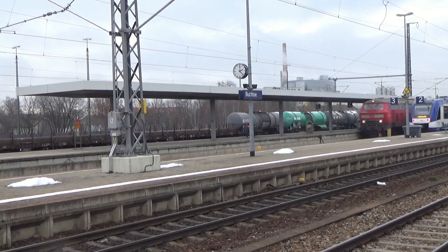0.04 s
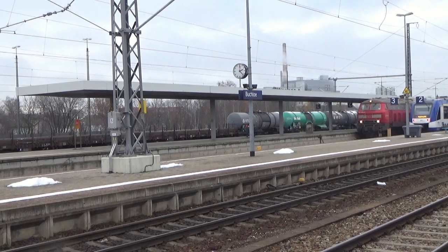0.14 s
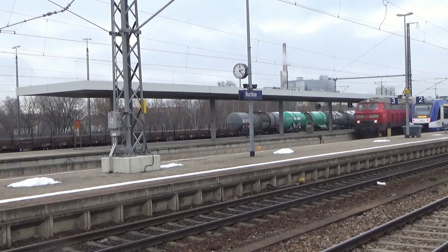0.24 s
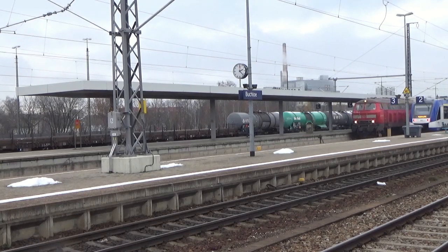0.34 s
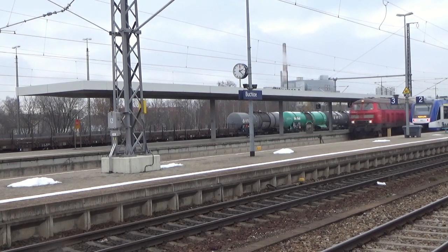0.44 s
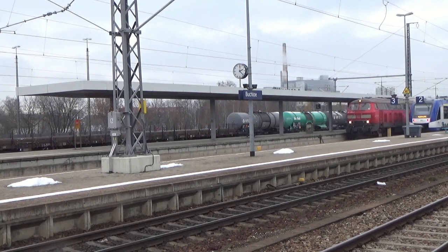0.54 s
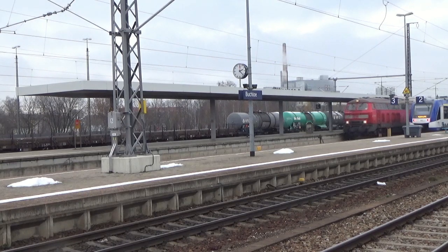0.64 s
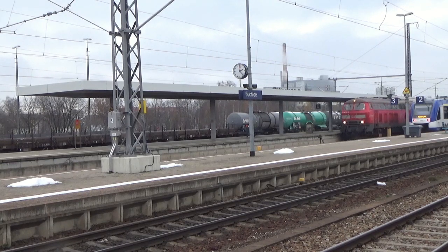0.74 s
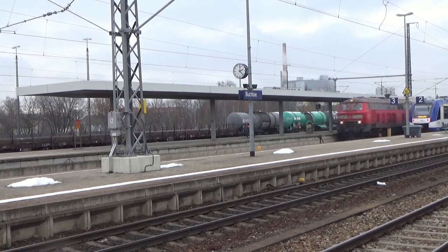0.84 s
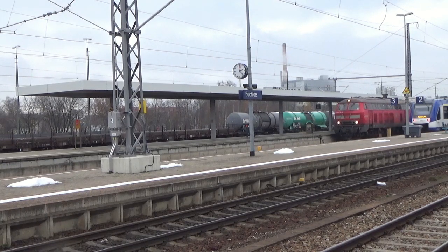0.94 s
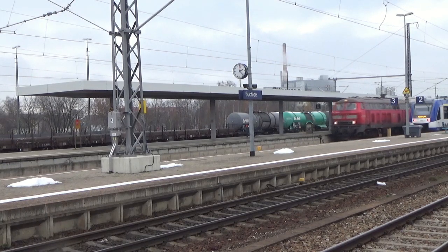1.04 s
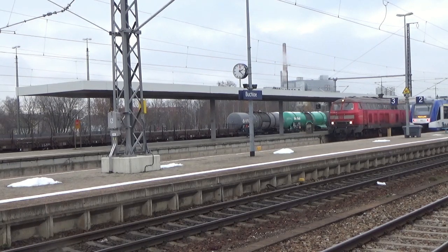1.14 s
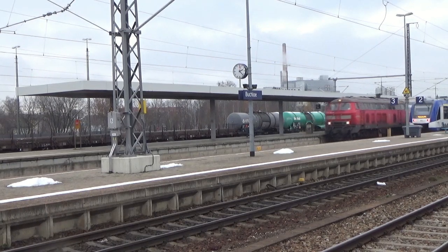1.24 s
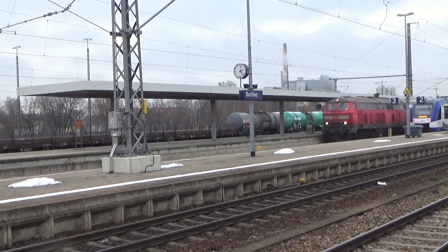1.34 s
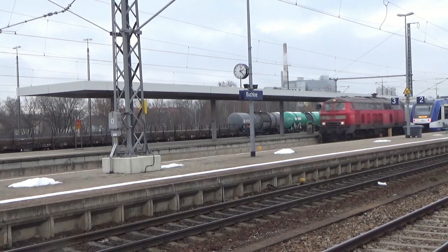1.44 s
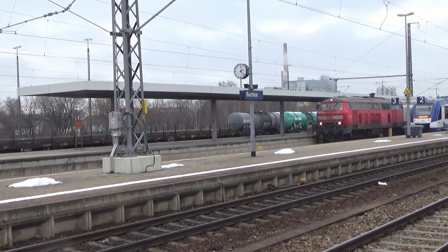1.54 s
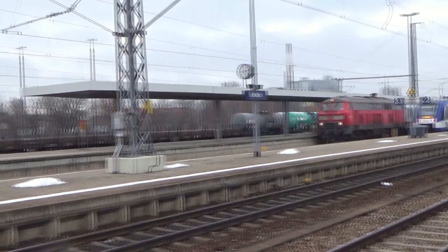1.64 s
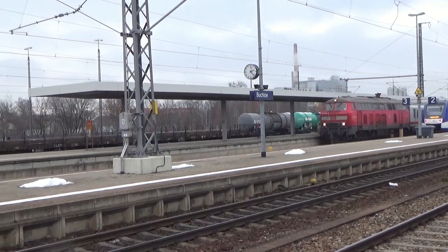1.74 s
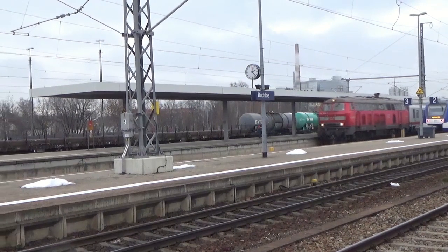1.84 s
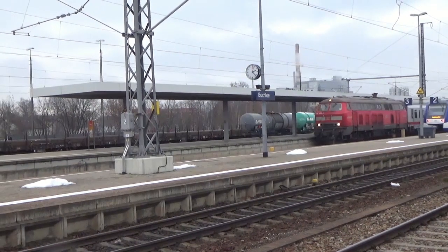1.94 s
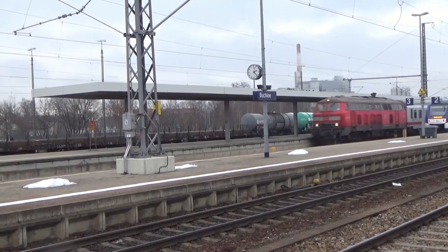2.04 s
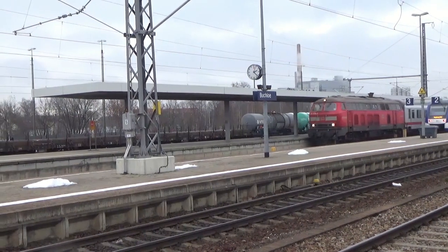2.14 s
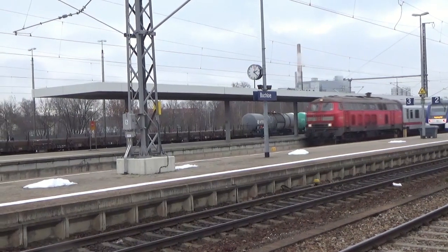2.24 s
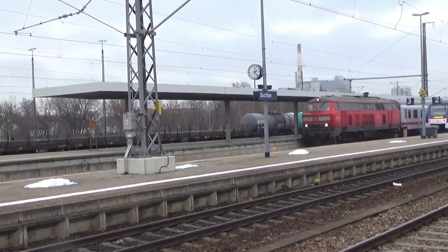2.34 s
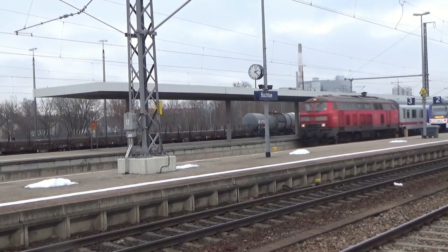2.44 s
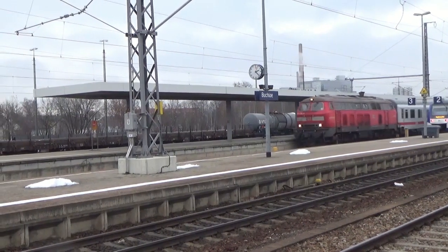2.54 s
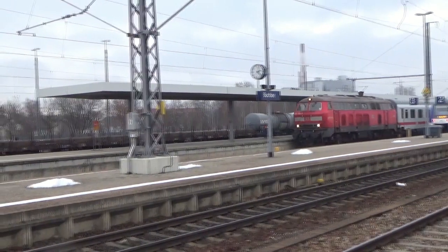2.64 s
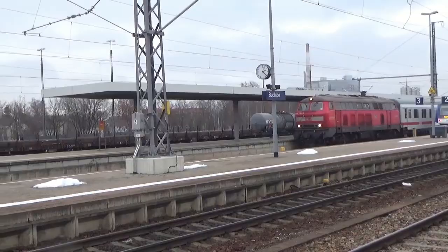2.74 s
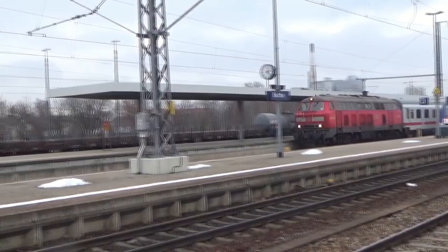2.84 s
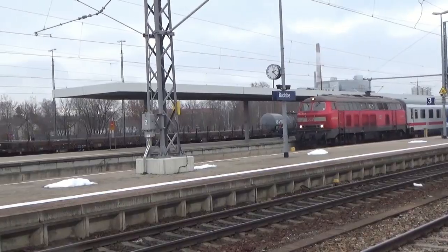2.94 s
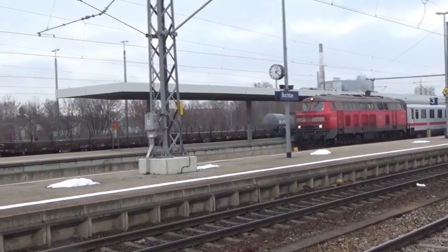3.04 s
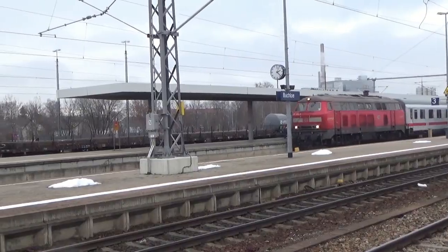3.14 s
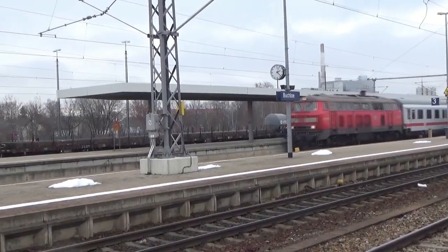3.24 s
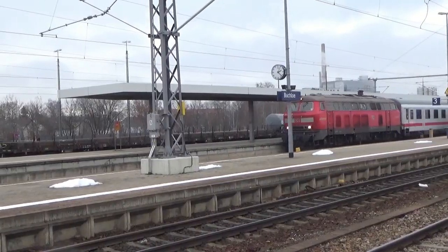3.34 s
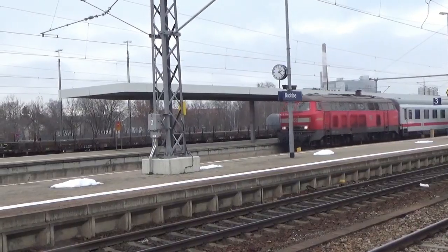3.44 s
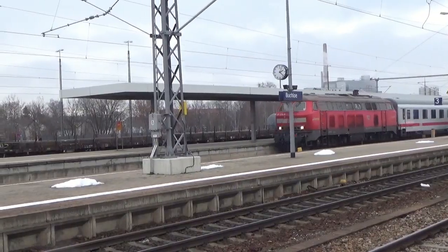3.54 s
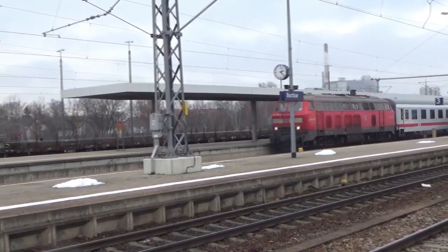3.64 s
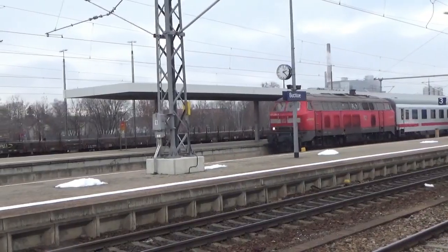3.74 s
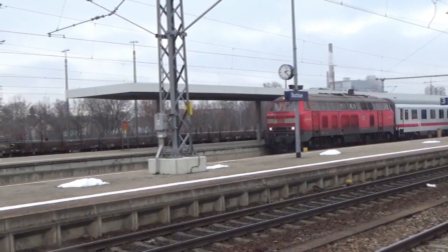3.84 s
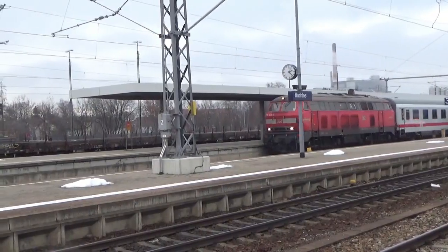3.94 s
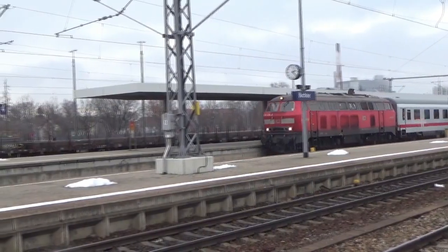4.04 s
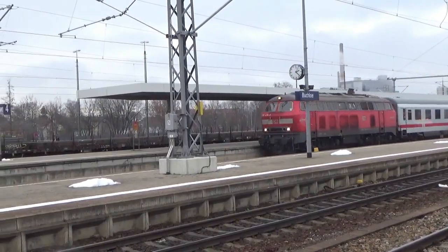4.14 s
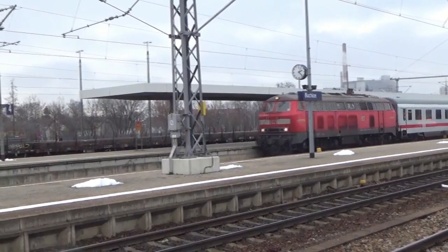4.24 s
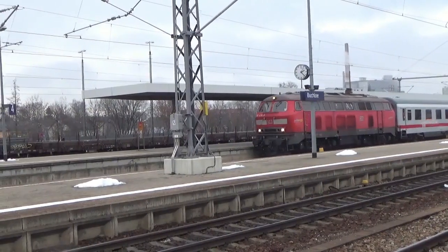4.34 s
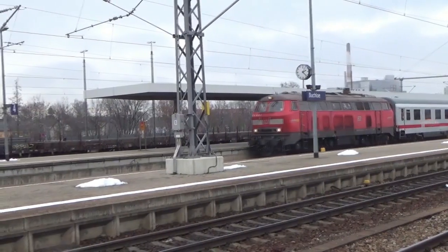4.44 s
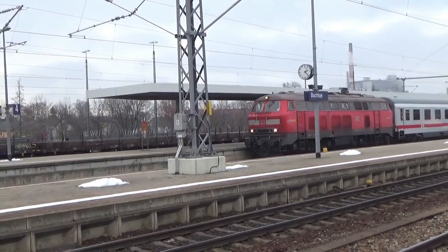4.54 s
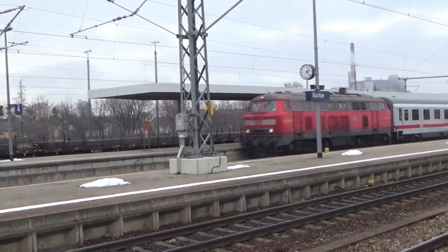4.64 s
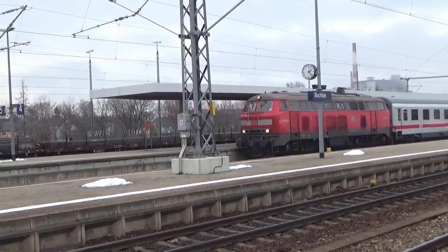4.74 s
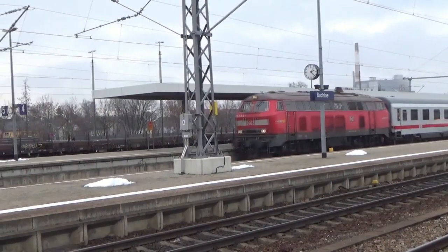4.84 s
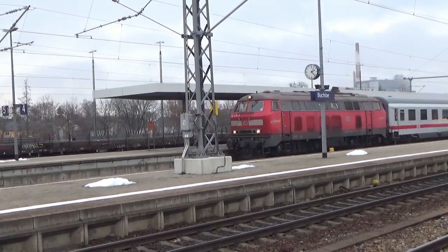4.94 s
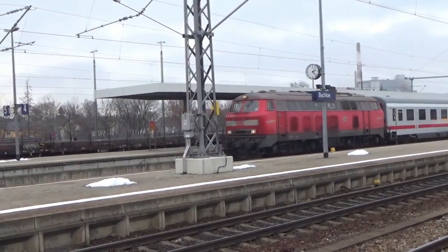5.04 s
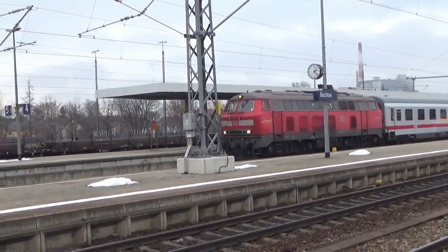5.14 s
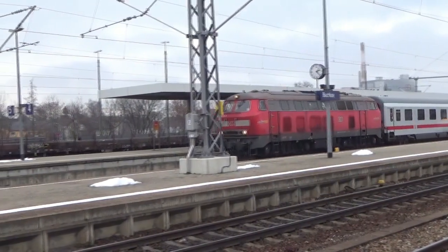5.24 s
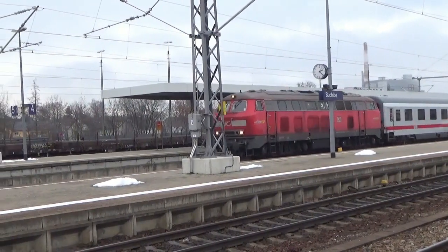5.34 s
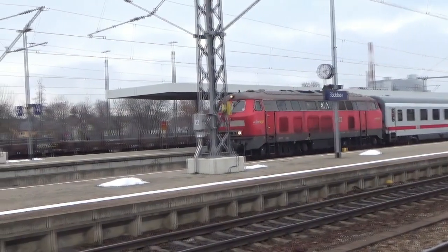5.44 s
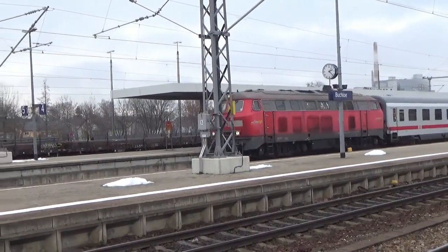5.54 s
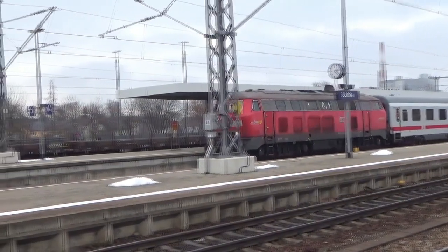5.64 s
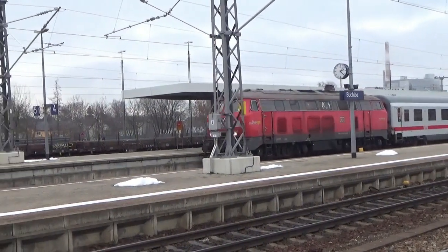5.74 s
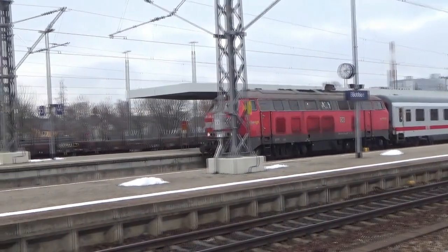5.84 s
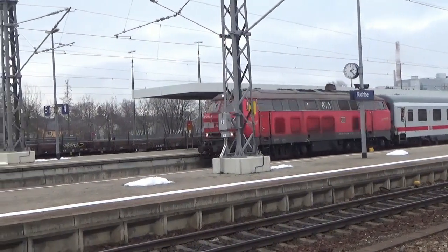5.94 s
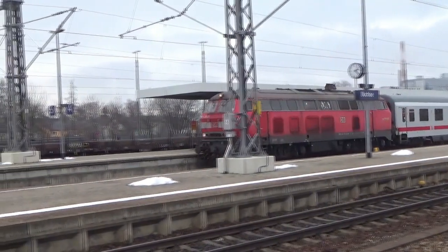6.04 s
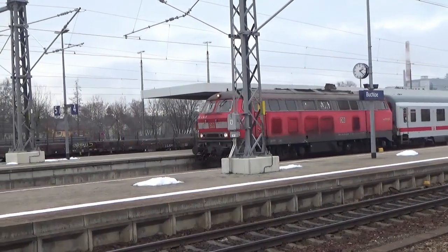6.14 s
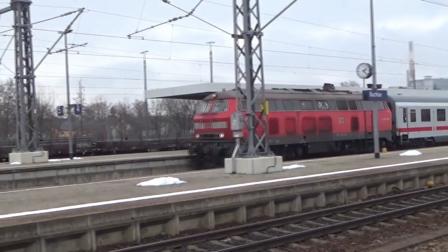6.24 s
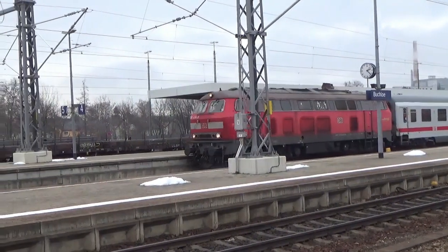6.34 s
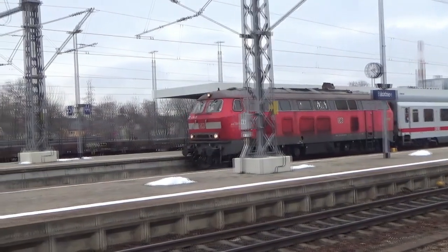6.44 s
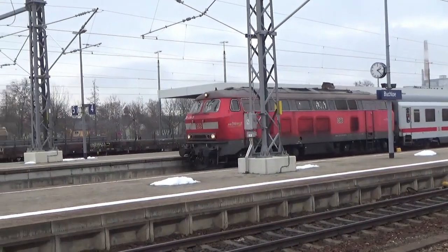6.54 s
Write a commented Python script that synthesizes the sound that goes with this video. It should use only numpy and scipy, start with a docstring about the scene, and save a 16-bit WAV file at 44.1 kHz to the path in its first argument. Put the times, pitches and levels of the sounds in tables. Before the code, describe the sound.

Idling diesel engine approaches with growing clatter and brake hiss; a harsh high squeal lasts about a second, followed by lower wheel moans.

```python
"""A diesel locomotive rolls into an open station, ticking over at about 600 rpm: noise shaped by silencer and
housing, partly recurring with each turn. Nearing, it grows louder, wider and different in colour.
From 2 s the brake blocks' hiss, coloured noise, stands out more. At about 4.3 s two beating rim tones squeal
in a ragged ringing for about a second, with a short chatter of resonances. The engine dips briefly at 4.8 s.
From 4.6 s six lower grinding moans, narrow notes in fuzzy bands, follow one another to the end."""
import sys
import numpy as np
from scipy import signal
from scipy.fft import rfft, irfft
from scipy.io import wavfile
from scipy.ndimage import uniform_filter1d

SR = 44100
rng = np.random.default_rng(int(sys.argv[2]) if len(sys.argv) > 2 else 0)


def log_audio(samples):
    """Write samples as a 16-bit WAV file to the path given in sys.argv[1]."""
    # one column per channel
    frames = np.atleast_2d(samples).T
    # limit to full scale, then quantise
    limited = np.clip(frames, -1, 1)
    pcm = np.round(limited * 32767).astype(np.int16)
    wavfile.write(sys.argv[1], SR, pcm)


N = 290619
TIME_S = np.arange(N) / SR
FRAME, OVERLAP = 2048, 1536  # samples
BIN_HZ = np.fft.rfftfreq(FRAME, 1 / SR)
SOUND_HZ = np.fft.rfftfreq(N, 1 / SR)

# Likeness of the ears with the train close: f/Hz, likeness/1
EAR_LIKENESS = [(40, .88), (150, .96), (500, .93), (900, .8), (2600, .74), (4400, .87), (5400, .74),
                (7400, .6), (9000, .74)]
# Left minus right level: f/Hz, difference/dB
EAR_LEVEL = [(150, 0), (550, -1), (770, -3.8), (1000, -2), (1600, -1.6), (2400, -2.7), (4100, -2.7),
             (4500, -1.8), (7500, -.2), (9000, -1.6)]
# Phase lead of the left ear: f/Hz, lead/rad
EAR_PHASE = [(100, 0), (700, .13), (2000, 0), (4400, -.22), (6300, -.05), (8700, .35), (9500, 0)]
# Approach: t/s, crankshaft rate as heard/(turns/s), nearness/1
APPROACH = [(0, 10.0, 0), (1.8, 10.02, .1), (3.7, 9.965, .6), (5.8, 9.94, 1), (6.6, 9.94, 1)]
# Engine spectrum head-on from afar: f/Hz, relative density/dB
ENGINE_FAR = [(15, -70), (25, -48), (66, -20), (134, -23.5), (177, -11), (211, -10.5), (258, -6.5),
              (360, -10), (540, -4.5), (1220, -1.5), (1450, -6.5), (1780, -3.5), (2350, -9), (3810, -9),
              (10800, -36.5), (14000, -69), (22000, -120)]
# Engine spectrum close from the side: f/Hz, relative density/dB
ENGINE_NEAR = [(15, -66), (25, -38), (130, -23.5), (211, -12), (333, -15), (513, -9.5), (993, -6.5),
               (1220, 0.5), (1530, -9.5), (1780, -8), (3530, -14.5), (4440, -14), (5580, -28.5),
               (9040, -21.5), (10800, -28.5), (14000, -61), (22000, -120)]
# Silencer and housing resonances: f/Hz, width/Hz, gain/dB
HOUSING_MODES = [(190, 30, 4), (265, 40, 3.5), (333, 39, -4), (571, 106, 2), (798, 52, -3.5),
                 (1980, 127, 3.5), (2350, 230, -1.5), (2580, 130, 2.5), (2860, 240, -2), (3210, 110, 1.5),
                 (3350, 140, -2), (3820, 250, 3), (4260, 240, -2), (5400, 170, 3), (6100, 620, 6)]
# Share of engine power that recurs each turn: f/Hz, share/1
RECURRING_SHARE = [(40, .4), (200, .55), (600, .62), (1100, .48), (2000, .2), (4000, .05)]
# Block hiss, 7-10.5 kHz, before trim and flutter: t/s, level/dB
RUB_LEVEL = [(0.0, -68), (1.99, -64), (2.01, -59.5), (4.36, -47), (4.98, -50), (5.84, -49), (6.09, -52.5),
             (6.55, -51)]
# Block hiss spectrum before the bass cut: f/Hz, relative density/dB
RUB_COLOUR = [(1500, -0.5), (3300, 8), (4400, 7), (5000, 2), (6200, 3), (7500, 0), (8800, -0.5),
              (10800, -9.5)]
# Wheel modes stirred by rubbing: f/Hz, width/Hz, gain/dB
WHEEL_MODES = [(4460, 80, 5), (4840, 70, 4), (5260, 170, 4), (5960, 160, 3), (6870, 110, 1),
               (8000, 190, 1.5)]
# Squealing rims, before power levelling: f/Hz, level/dB
RIM_TONES = [(4423.7, -3.6), (4359.2, -8.2)]
# Ragged ringing round the rims, before power levelling: f/Hz, pole width/Hz, level/dB
RIM_RINGING = [(4410, 310, -2.5), (3976, 620, -11), (4660, 1450, -13.5)]
# Squeal flares: middle t/s, length/s, boost/dB
FLARES = [(4.74, 0.054, 2.5), (5.05, 0.017, 7), (5.245, 0.23, 4.5)]
# Rough chatter bands: f/Hz, pole width/Hz, relative level/dB
CHATTER_BANDS = [(2264, 240, -0.1), (6510, 650, 0)]
# Wheel tones set off by chatter: f/Hz, pole width/Hz, relative level/dB
CHATTER_TONES = [(2205, 10, -5.5), (6921, 10, -9), (7480, 120, -18)]
# Grinding moans: middle t/s, length/s, level/dB, f/Hz
MOANS = [(4.633, 0.27, -33.5, 1122), (5.004, 0.3, -31, 1123), (5.42, .52, -30, 1172),
         (5.872, 0.34, -29.5, 1215), (6.156, 0.19, -28.5, 1161), (6.387, 0.2, -25, 1210)]

# Even slowing, from t = 0; sets the engine level
DISTANCE_M, SPEED_M_PER_S, BRAKING_M_PER_S2 = 99, 14.52, 1.88
# Engine band targets at t = 0, before the exhaust crossfade: 450-1000 Hz, 100-400 Hz
CLATTER_DB, RUMBLE_DB = -38, -46.5
LULL_S, LULL_HALF_WIDTH_S, LULL_DB = 4.79, 0.39, -3
BITE_S, EASE_S = 4.27, 4.797  # hardest bite begins, ends
SQUEAL_DB, SQUEAL_RISE_DB_PER_S, SQUEAL_FADE_DB_PER_S = -18.5, 107, 23
CHATTER_DB, CHATTER_RISE_DB_PER_S, CHATTER_FADE_DB_PER_S = -34, 188, 96
EDGE_HZ = 11000


def gain_of(db):
    """Decibels to amplitude."""
    return 10 ** (np.asarray(db) / 20)


def evened(x):
    """Scale to rms 1."""
    return x / np.sqrt(np.mean(x ** 2) + 1e-20)


def read(points, hz):
    """Interpolate a spectrum table on a log-frequency axis."""
    f, value = np.transpose(points)
    return np.interp(np.log(hz + 1), np.log(f + 1), value)


def follow(rows, t=TIME_S):
    """Interpolate the columns of a time table at t."""
    s, *columns = np.transpose(rows)
    return [np.interp(t, s, c) for c in columns]


def bumps(modes, hz):
    """Summed gain in dB of a resonance table."""
    return sum(db * np.exp(-2 * ((hz - centre) / width) ** 2) for centre, width, db in modes)


def swell(middle_s, length_s, t=TIME_S):
    """Gaussian rise and fall of height 1; length between the 1/e points."""
    return np.exp(-(2 * (t - middle_s) / length_s) ** 2)


def wander(rate_hz):
    """Slow random drift of rms 1: noise under a Gaussian low-pass."""
    spectrum = rfft(rng.standard_normal(N))
    return evened(irfft(spectrum * np.exp(-(SOUND_HZ / rate_hz) ** 2), N))


def spectra(x):
    """Short-time spectra, frames by bins."""
    return signal.stft(x, nperseg=FRAME, noverlap=OVERLAP)[2].swapaxes(-1, -2)


def sound(z):
    """Short-time spectra back to samples."""
    return signal.istft(z.swapaxes(-1, -2), nperseg=FRAME, noverlap=OVERLAP)[1][..., :N]


def ring(hz, width_hz):
    """Resonance kept ringing by random friction: double-pole filtered noise moved up to hz."""
    r = np.exp(-np.pi * width_hz / SR)
    friction = rng.standard_normal(N) + 1j * rng.standard_normal(N)
    envelope = signal.lfilter([1], [1, -2 * r, r * r], friction)
    carrier = np.exp(2j * np.pi * np.cumsum(hz * np.ones(N)) / SR)
    return evened((envelope * carrier).real)


def smoothed_noise(shape, frames, bins):
    """Noise averaged over frames and bins, rms 1."""
    over_time = uniform_filter1d(rng.standard_normal(shape), size=frames, axis=0)
    return evened(uniform_filter1d(over_time, size=bins, axis=1))


def air(shape, ripple_db=1.08, patchy_db=1.17):
    """Ground and wall echoes slide slow ripples through the spectrum; moving air adds brief patches (dB)."""
    ripple = smoothed_noise(shape, 160, 2) * np.minimum(BIN_HZ / 1500, 1)
    patches = smoothed_noise(shape, 10, 12)
    return ripple_db * ripple + patchy_db * patches


def spread(direct, scattered, far_db=-5.5):
    """Station scatter differs between the ears, so the train widens with nearness."""
    same = np.clip(read(EAR_LIKENESS, SOUND_HZ), 0, .995)
    side = irfft(rfft(scattered) * np.sqrt((1 - same) / (1 + same)), N)
    side *= gain_of(far_db * (1 - follow(APPROACH)[1] ** 2))
    # half the level and phase difference on each ear
    ear = gain_of(read(EAR_LEVEL, SOUND_HZ) / 2) * np.exp(.5j * read(EAR_PHASE, SOUND_HZ))
    return irfft(rfft([direct + side, direct - side]) * np.array([ear, 1 / ear]), N)


def rub(trim_db=6, flutter_db=0.94):
    """Brake blocks rub the wheels: broad noise coloured by wheel modes, with fluttering level."""
    colour = gain_of(read(RUB_COLOUR, BIN_HZ) + bumps(WHEEL_MODES, BIN_HZ))
    colour *= np.minimum(BIN_HZ / 1000, 1) ** 2  # bass cut
    top = (BIN_HZ > 7000) & (BIN_HZ < 10500)
    colour /= np.sqrt(np.mean(colour ** 2 * top))
    z = spectra(rng.standard_normal(N))
    hiss = sound(z * colour * gain_of(air(z.shape)))
    return hiss * gain_of(follow(RUB_LEVEL)[0] + trim_db + flutter_db * wander(15))


def grind(width_hz=230, core_width_hz=35, core_db=-3):
    """The slowing wheels moan: each time a narrow note swells and fades inside a fuzzy band."""
    out = np.zeros(N)
    for middle_s, length_s, db, hz in MOANS:
        moan = ring(hz, width_hz) + gain_of(core_db) * ring(hz, core_width_hz)
        out += evened(moan) * gain_of(db) * swell(middle_s, length_s)
    return out


def bite(rise_db_per_s, fade_db_per_s):
    """Vibration level in dB: builds up, holds while the blocks bite hardest, dies away."""
    rise = -rise_db_per_s * np.maximum(BITE_S - TIME_S, 0)
    return rise - fade_db_per_s * np.maximum(TIME_S - EASE_S, 0)


def chatter():
    """Hardest bite: rough bands near 1/2 and 3/2 of the squeal pitch, with wheel tones."""
    modes = list(CHATTER_BANDS) + list(CHATTER_TONES)
    out = sum(gain_of(db) * ring(hz, width) for hz, width, db in modes)
    return out * gain_of(CHATTER_DB + bite(CHATTER_RISE_DB_PER_S, CHATTER_FADE_DB_PER_S))


def squeal(waver_hz=4, flicker=0.28, octave_db=-23, octave_ring_db=-19.0,
           lock=0.33, flutter_db=0.43, loose_db=1.3):
    """Two rims sing a little apart and beat inside a ragged ringing; stick-slip adds the octave."""
    level = bite(SQUEAL_RISE_DB_PER_S, SQUEAL_FADE_DB_PER_S)
    purity = gain_of(lock * level)  # tones hold best under a hard bite
    level = level + (flutter_db + loose_db * (1 - gain_of(level))) * wander(30)  # loose grip flutters more
    level = level + sum(db * swell(s, length) for s, length, db in FLARES)
    out = sum(gain_of(db) * ring(hz, width) for hz, width, db in RIM_RINGING)
    for hz, db in RIM_TONES:
        angle = 2 * np.pi * np.cumsum(hz + waver_hz * wander(30.7)) / SR
        height = np.sqrt(2) * gain_of(db) * purity * evened(1 + flicker * wander(50))
        octave = height ** 2 * gain_of(octave_db) * 2 * np.sin(2 * angle)
        out += height * np.sin(angle) + octave
    out /= np.sqrt(uniform_filter1d(out ** 2, size=1800))  # friction feeds limited power
    out += gain_of(octave_ring_db) * ring(8770, 700)
    return out * gain_of(SQUEAL_DB + level)


def revolutions(turns, count=4, size=4410):
    """Clatter repeating each turn; crossfaded patterns drift as the echo paths change."""
    out = np.zeros(N)
    strength = rng.uniform(.5, 1.35, size // 2)  # per order of the turn rate
    for k in range(count):
        orders = strength * np.exp(2j * np.pi * rng.random(size // 2))
        pattern = irfft(orders, size * 8)  # one turn, oversampled
        place = TIME_S / TIME_S[-1] * (count - 1) - k
        weight = np.cos(np.pi / 2 * np.clip(place, -1, 1))
        out += weight * pattern[(turns % 1 * len(pattern)).astype(int)]
    return evened(out)


def closing_db(t):
    """Engine gain: inverse distance, with one brief dip."""
    distance_m = DISTANCE_M - SPEED_M_PER_S * t + BRAKING_M_PER_S2 * t ** 2 / 2
    dip_db = LULL_DB * swell(LULL_S, 2 * LULL_HALF_WIDTH_S, t)
    return 20 * np.log10(DISTANCE_M / np.maximum(distance_m, 1)) + dip_db


def band_db(power, low_hz, high_hz):
    """Level of one band in each frame."""
    band = (BIN_HZ > low_hz) & (BIN_HZ < high_hz)
    return 10 * np.log10(np.mean(power * band, 1, keepdims=True))


def engine(throb=0.04, shade_db=-4, side_db=-1.5):
    """Six firings a turn: recurring clatter and fresh turbulence pass the silencer and housing."""
    turns = np.cumsum(follow(APPROACH)[0]) / SR
    firing = 1 + throb * np.cos(2 * np.pi * 6 * turns)
    share = np.clip(read(RECURRING_SHARE, BIN_HZ), 0, 1)
    clatter = spectra(revolutions(turns) * firing)
    turbulence = spectra(rng.standard_normal(N) * firing)
    z = np.sqrt(share) * clatter + np.sqrt(1 - share) * turbulence

    t = np.linspace(0, TIME_S[-1], len(z))[:, None]
    near = follow(APPROACH, t)[1]
    colour = (1 - near) * read(ENGINE_FAR, BIN_HZ) + near * read(ENGINE_NEAR, BIN_HZ)
    colour += bumps(HOUSING_MODES, BIN_HZ)
    colour += read([(4500, 0), (8000, shade_db)], BIN_HZ)  # housing holds back the top treble
    # hollower from the side
    colour += near * read([(950, 0.5), (1200, -6), (1550, 0), (3500, side_db)], BIN_HZ)

    power = gain_of(colour) ** 2
    rumble_db = RUMBLE_DB - band_db(power, 100, 400)
    clatter_db = CLATTER_DB - band_db(power, 450, 1000)
    exhaust = np.clip(read([(330, 1), (480, 0.099)], BIN_HZ), 0, 1)  # exhaust carries the bass
    level = closing_db(t) + exhaust * rumble_db + (1 - exhaust) * clatter_db
    return sound(z * gain_of(colour + level + air(z.shape)))


def train():
    """Sum of brakes and engine."""
    return rub() + grind() + chatter() + squeal() + engine()


def scene():
    """The train, a little to the right; a second draw is its scatter from platforms and roofs."""
    return spread(train(), train())


def record(dry):
    """Linear-phase low-pass at EDGE_HZ."""
    lowpass = signal.firwin(1023, EDGE_HZ, window=("kaiser", 9), fs=SR)
    return signal.oaconvolve(dry, lowpass[None], "same")


dry = scene()
out = record(dry)
log_audio(out)
```